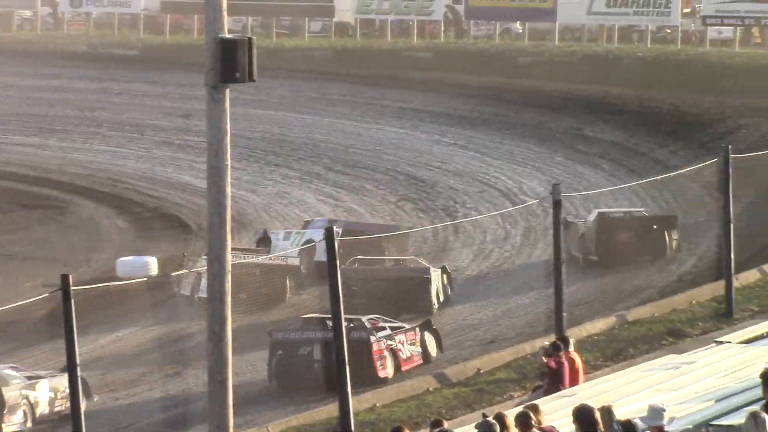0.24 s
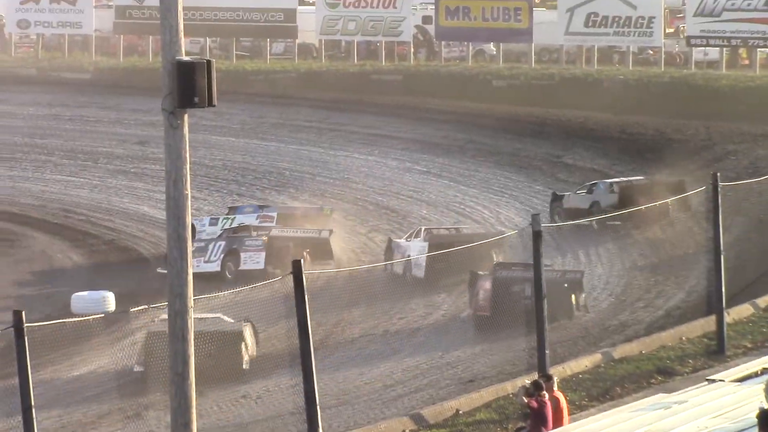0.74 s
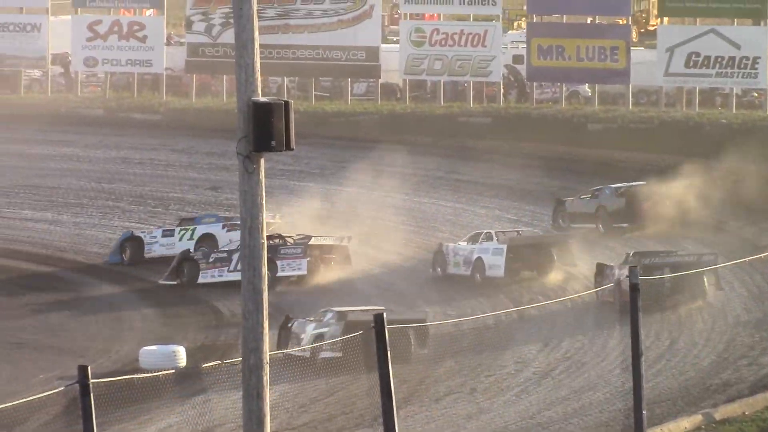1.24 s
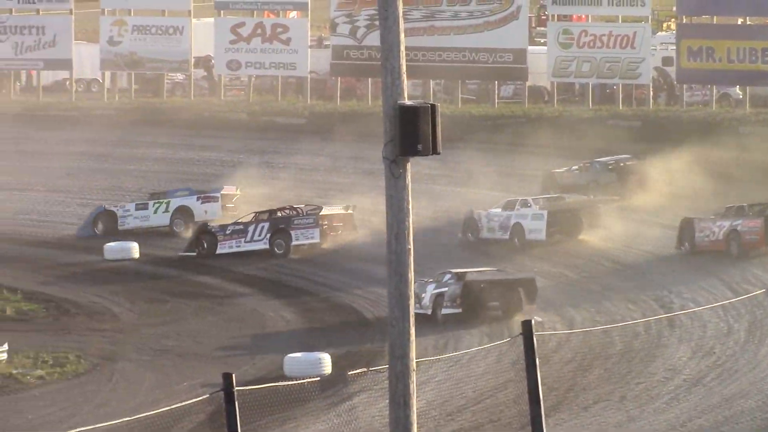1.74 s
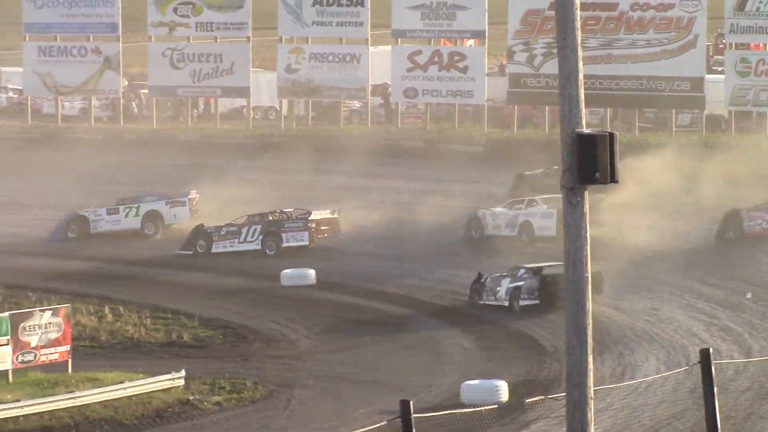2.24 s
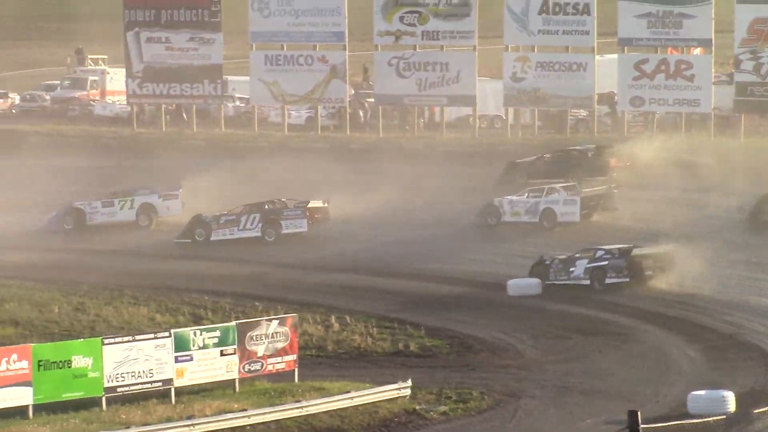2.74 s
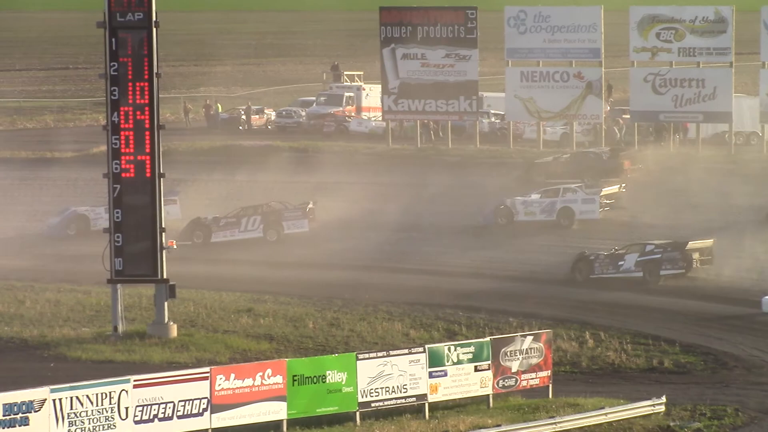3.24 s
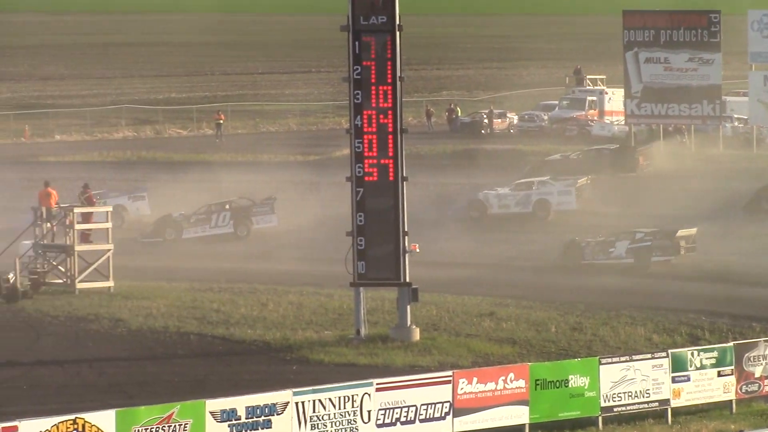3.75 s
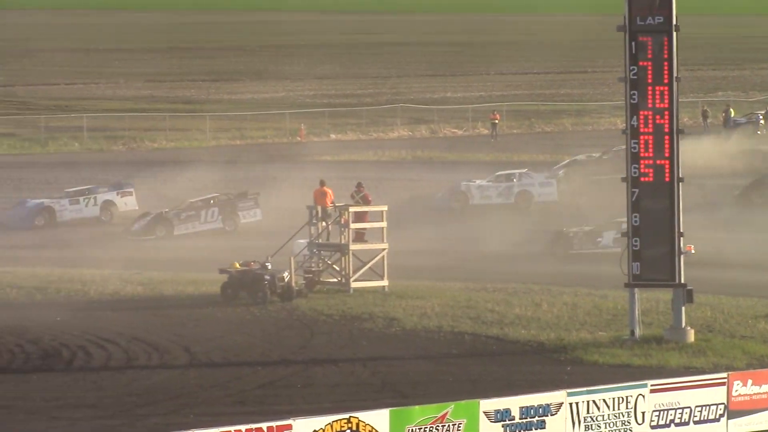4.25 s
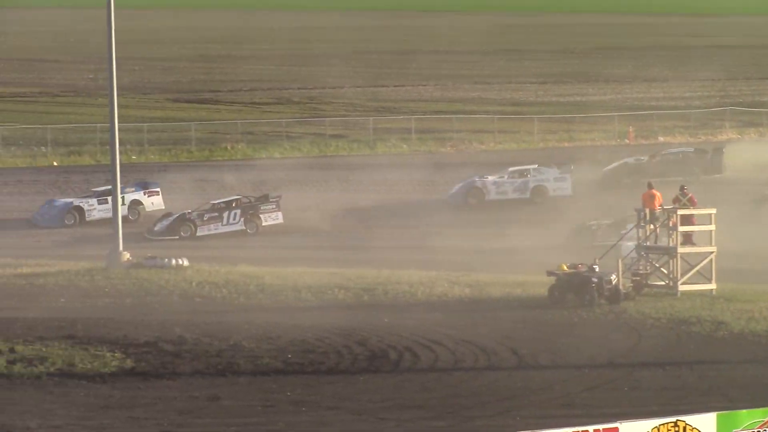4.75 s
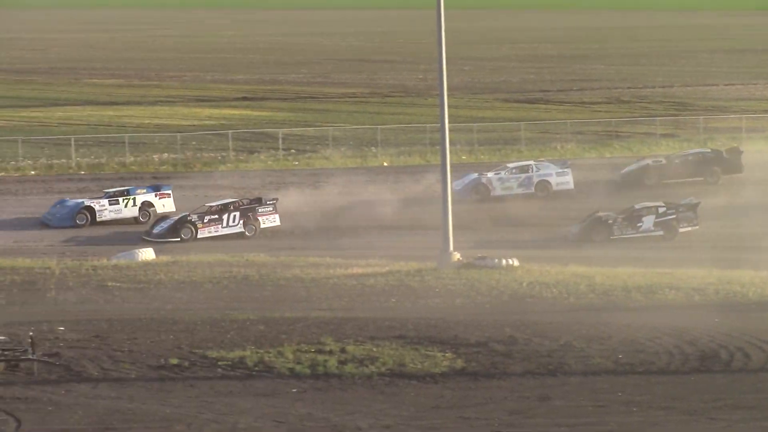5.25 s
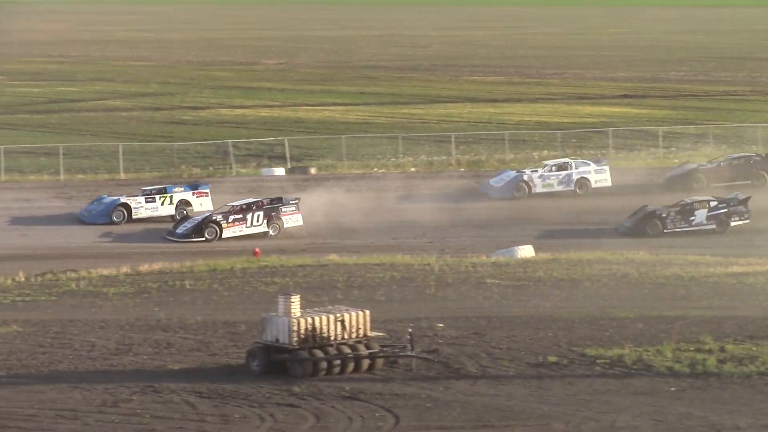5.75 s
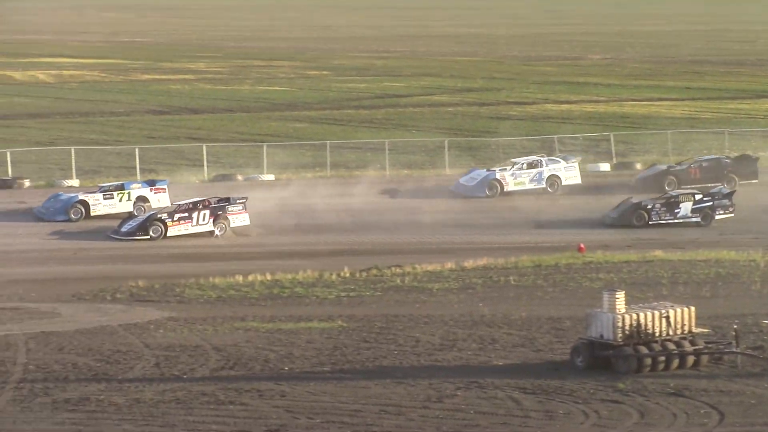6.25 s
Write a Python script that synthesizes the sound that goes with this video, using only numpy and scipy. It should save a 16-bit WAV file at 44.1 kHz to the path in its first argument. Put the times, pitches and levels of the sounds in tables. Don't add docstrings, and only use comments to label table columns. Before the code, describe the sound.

Several open-exhaust race engines rasp and pop around a dirt oval, subdued at first, building steeply into a loud, slightly distorted roar.

```python
import sys
import numpy as np
from scipy import signal
from scipy.io import wavfile
from scipy.ndimage import uniform_filter1d

SR = 44100
rng = np.random.default_rng(int(sys.argv[2]) if len(sys.argv) > 2 else 0)


def store_pcm(level_fs):
    pcm = np.round(np.clip(level_fs, -1, 1) * 32767).astype(np.int16)
    wavfile.write(sys.argv[1], SR, np.atleast_2d(pcm).T)


def ratio_of_db(decibels):
    return 10 ** (np.asarray(decibels, float) / 20)


N = 286650

# t/s, firing rate f/Hz, share of the pack level/dB
LEAD_CAR = [(0, 290, -2), (.5, 282, 2), (1.1, 306, 1), (1.35, 306, 2), (1.55, 274, 2), (2.5, 278, 4),
            (2.7, 302, 5), (3.35, 311, 4), (3.7, 296, 4), (4.5, 302, 2), (5, 318, 2), (5.8, 266, -2),
            (6.5, 268, -1)]
# t/s, firing rate f/Hz, share of the pack level/dB
CHASING_CARS = [
    [(0, 251, -3), (.6, 329.3, 4), (1.15, 410.8, 6), (1.6, 386.7, -7.5), (2.75, 412.4, 5), (3.1, 419, 2.5),
     (4, 395.7, 0.5), (5.6, 413.7, -6), (6.5, 397.2, -2)],
    [(0, 235, -8), (1.2, 245.5, -1.5), (2, 352, -5), (3, 374, 0), (3.6, 356, -12), (5, 363.8, -13.5),
     (5.8, 341.9, 0.5), (6.5, 328.5, 0.5)],
    [(0, 317.7, -19), (1.8, 275.5, 2.5), (3.3, 290.4, -7.5), (4.3, 283.7, -6), (5.4, 286.7, -0.5),
     (5.9, 236.2, -3.5), (6.2, 244.1, -4), (6.5, 260.7, -1.5)],
    [(0, 361, -7.5), (1.5, 316.7, -10.5), (3, 259.4, 4), (4.2, 255.2, -2), (4.6, 344.5, 1),
     (5.5, 299.6, 1.5), (6.5, 306.4, -3.5)],
]
CYLINDER_LEVELS = [0, -4, -1.5, -5, -1, -3, -5.5, -2.5]
# t/s, roar level/dB
THROTTLE = [(0, -32), (.2, -34.5), (.42, -36.5), (.55, -35), (.72, -33.5), (.88, -32.5), (1.5, -35),
            (1.63, -40.5), (2.0, -36.5), (2.55, -37.5), (3.4, -35.5), (3.85, -34.5), (4.0, -32.5),
            (4.12, -30.5), (4.5, -28), (5.2, -23), (5.85, -16.5), (6.15, -15), (6.5, -14.5)]
# f/Hz, level/dB per Hz
ROAR_COLOUR = [(130, -55), (240, -39.5), (300, -30), (450, -25.5), (620, -5), (800, -5), (1070, -4.5),
               (1400, 1.5), (2800, 0), (4100, -10), (5000, -23), (6500, -26), (9000, -43.5), (11000, -61.5),
               (13000, -75.5), (15000, -100)]
# t/s, f/Hz
RASP_CENTRE = [(0, 2300), (.6, 2500), (.8, 1700), (.95, 2800), (1.2, 2900), (1.45, 2000), (1.9, 1600),
               (2.3, 2450), (2.9, 2240), (3.6, 2500), (4.15, 2700), (4.32, 1990), (5.03, 2500),
               (5.56, 2100), (5.72, 2580), (6.08, 2600), (6.2, 1600), (6.5, 1600)]
# t/s, level/dB at 110 Hz, at 300 Hz, at 500 Hz
WIND_FILTER = [(0, 8, -8.5, -7.5), (1.55, 13, -4, -4.5), (3.28, 15.5, 6, -12.5), (3.78, 6, 9, -4),
               (4.295, 8, -5.5, -2.5), (4.78, 5, 7.5, -12.5), (5.27, 14.5, 10, -2), (5.79, 2, 12, 1)]
# f/Hz, level/dB
PORT_SPREAD = [(300, -60), (1300, -39), (2200, -27), (3600, -19), (5500, -11), (8500, -14), (11500, -3),
               (14000, 0)]
# t/s, side level/dB at 2 kHz, at 10 kHz
BEARING = [(0, -17, 3), (1.5, -11, 0), (3.5, -4, -3), (4.5, -1, -8), (6.5, 3.5, -9)]
# t/s, peak level/dB, f/Hz
POPS = [(0.181, -19, 2000), (0.251, -19, 2740), (0.534, -23, 2800), (0.588, -21, 2660), (0.761, -19, 1690),
        (0.9777, -20.5, 1750), (1.0326, -24, 2760), (1.375, -27.5, 2810), (1.4292, -16, 1880),
        (1.512, -20, 2260), (1.8013, -27, 2610), (1.8857, -25.5, 1711), (1.9344, -26, 2800),
        (2.1086, -27, 1520), (2.2365, -19.5, 1760), (2.5222, -30, 1790), (2.6454, -26.5, 1740),
        (2.9103, -24, 3200), (2.9621, -20.5, 2540), (3.0605, -29, 2700), (3.1054, -26, 1900),
        (3.208, -29, 2840), (3.316, -24.5, 1790), (3.3748, -25.5, 2630), (3.503, -29.5, 2070),
        (3.5604, -29, 2350), (3.659, -23.5, 2300), (3.8876, -24, 2710), (3.934, -23.5, 1910),
        (3.9814, -23, 1930), (4.0249, -24.5, 2130), (4.0637, -24, 2580), (4.2902, -15, 1870),
        (4.5017, -25.5, 1700), (4.5546, -23, 2100), (4.6309, -11, 2230), (4.6763, -22, 1910),
        (4.9203, -22, 2040), (4.9781, -13.5, 2630), (5.2326, -16.5, 1900), (5.3493, -16, 2220),
        (5.4565, -12.5, 1820), (5.5833, -17, 1790), (5.7456, -9.5, 2340), (5.7948, -13.5, 2050),
        (5.859, -8, 2110), (6.0028, -7.5, 2200), (6.2911, -5.5, 1640), (6.3447, -15, 2210),
        (6.3735, -11, 1700)]
# t/s, length/s, from f/Hz, to f/Hz, level/dB in the pack
PIPE_NOTES = [(.6, .5, 330, 400, -21), (.95, .22, 300, 330, -18), (.65, .22, 1430, 1400, -21),
              (.89, .15, 770, 805, -16), (.89, .13, 715, 745, -16), (.91, .08, 1130, 1140, -16),
              (1.08, .14, 770, 755, -16), (.48, .15, 950, 935, -20), (1.0, .2, 1450, 1400, -18),
              (2.0, .27, 715, 735, -19), (2.5, .35, 385, 418, -15), (2.4, .67, 860, 985, -15.5),
              (2.5, .4, 750, 810, -19), (2.98, .22, 800, 815, -17), (3.74, .58, 104, 113, -16),
              (3.447, .63, 362, 360, -21.5), (3.9, .45, 768, 792, -18), (3.95, .17, 945, 975, -19),
              (4.358, .33, 680, 692, -21), (4.62, .18, 625, 610, -21), (5.3, .17, 575, 578, -18),
              (5.5, .12, 560, 565, -21), (5.453, .23, 408, 414, -20), (5.55, .45, 150, 180, -15),
              (5.3, .25, 240, 235, -20), (6.15, .35, 188, 181, -19), (5.8, .11, 810, 815, -19),
              (5.8, .12, 695, 710, -22), (6.0, .2, 740, 752, -18), (6.0, .24, 795, 805, -20),
              (6.05, .2, 645, 685, -21), (6.15, .15, 488, 487, -21), (6.197, .3, 528, 540, -21),
              (6.05, .3, 1400, 1370, -21), (6.2, .23, 640, 600, -21), (6.3, .13, 735, 745, -18),
              (6.24, .22, 955, 940, -19), (6.14, .15, 985, 990, -21), (6.25, .21, 1150, 1145, -19),
              (6.38, .14, 1005, 1015, -18)]
# t/s, length/s, from f/Hz, to f/Hz, level/dB in the pack
MORE_PIPE_NOTES = [(2.6, .8, 298, 313, -15), (3.25, .65, 314, 298, -15.5), (3.8, .5, 300, 290, -19),
                   (2.75, .4, 415, 422, -17), (3.3, .35, 1140, 1125, -15), (5.9, .3, 1340, 1375, -21)]
# t/s of the peak, swell level/dB, rise/s, fall/s, extra bite level/dB
STABS = [(.79, 3, 0.053, 0.06, -2.5), (1.02, 1, 0.051, 0.11, 1), (1.2, 2, 0.24, 0.046, 1),
         (1.51, 1.5, .06, .02, -1.5), (1.89, 3.5, 0.034, .03, -2.5), (2.25, -0.5, 0.11, 0.2, 4),
         (2.749, 0, 0.15, 0.32, 2.5), (2.949, 0, 0.2, 0.17, 2.5), (3.32, 0, 0.042, 0.064, 0),
         (3.57, 0.5, 0.069, 0.063, 3), (4.11, 0.5, 0.11, 0.076, 3.5), (4.23, 2.5, 0.063, 0.021, -0.5),
         (4.31, 7, 0.24, 0.14, 2), (4.72, 2, 0.11, 0.074, 1), (5.039, 2.5, 0.3, 0.09, 3.5),
         (5.36, 1.5, 0.027, 0.036, -0.5), (5.49, 3, 0.36, 0.028, 0), (5.72, 1, 0.097, 0.012, 7),
         (5.754, -2.5, 0.031, .03, 9.5), (5.82, 0.5, 0.047, 0.036, 1), (5.94, 0.5, 0.043, 0.034, 2),
         (6.04, 0, 0.049, 0.039, 4), (6.1, 0.5, 0.1, 0.04, 4), (6.29, 0.5, 0.062, 0.027, 3),
         (6.44, 0.5, 0.056, .04, -0.5)]
# t/s, level/dB, f/Hz
GRIT = [(.79, -40, 1500), (1.43, -42, 1200), (1.45, -46, 800), (2.32, -44, 1400), (2.32, -60, 9000),
        (4.59, -51, 9000), (4.632, -31, 6000)]
# t/s, length/s, from f/Hz, to f/Hz, level/dB
INSECT = (5.16, .09, 9700, 10300, -66)
# t/s, level/dB
OVERLOADS = [(5.748, -34), (5.805, -36), (6.035, -33), (6.052, -33), (6.07, -33), (6.1135, -19),
             (6.27, -37), (6.29, -35)]

BODY_DB, BODY_PER_STAB = 0, -0.56
PIPES_TURN_S, PIPES_TURN_LENGTH_S, PIPES_TURN_DB = 5.82, 0.82, 6.5
AIR_NEAR_DB, AIR_FAR_DB, RECEDE_S = 18.5, -2.5, 2.94
AIR_PER_STAB = -0.083
BITE_HZ, BITE_OCTAVES, FLUTTER_DB = 4000, 0.99, -0.2
RASP_DB, RASP_OCTAVES = 1, 0.25
LEAN, LEAN_FADE_S, LEAN_STAYS = .1, 1.2, .02
POP_DB, POP_DECAY_S = -8, .002
UPPER_NOTES_DB = -1
CLIP_AT, RAIL_DB, SPRAY_DB = 5., -25, -11


def unit(x):
    return x / np.sqrt(np.mean(x ** 2))


def curves(table):
    s, *columns = np.transpose(table)
    return [np.interp(np.arange(N) / SR, s, c) for c in columns]


def on_log(hz, table):
    f, db = np.transpose(table)
    return np.interp(np.log(hz + 1), np.log(f), db)


def walk(rate):
    k = int(SR / rate)
    held = np.repeat(rng.standard_normal(N // k + 1), k)
    return uniform_filter1d(uniform_filter1d(held, k), k)[:N]


def engine(hz, wobble, scatter_db, puff, split_hz):
    turns = np.cumsum(hz * (1 + wobble * walk(rate=12))) / SR + rng.random()
    firing = turns.astype(int)
    scatter = scatter_db * rng.standard_normal(4000)[firing]
    size = ratio_of_db(np.array(CYLINDER_LEVELS)[firing % 8] + scatter)
    edge = np.flatnonzero(np.diff(firing))
    late = (turns[edge + 1] % 1) / (turns[edge + 1] - turns[edge])
    pulses = np.zeros(N)
    pulses[edge] = size[edge + 1] * late
    pulses[edge + 1] = size[edge + 1] * (1 - late)
    gas = unit(size * np.exp(-(turns % 1) / puff) * rng.standard_normal(N))
    low = signal.butter(1, split_hz, fs=SR)
    return signal.lfilter(*low, unit(pulses)), gas - 0.53 * signal.lfilter(*low, gas)


def stands(x, t60_s, wet_db):
    hop, t = SR // 5, np.arange(SR // 2) / SR
    padded, out = np.pad(x, (hop, 2 * hop)), np.zeros(N + 8 * hop)
    fade = np.sqrt(np.hanning(2 * hop))
    for start in range(0, N + hop, hop):
        tail = rng.standard_normal(len(t)) * ratio_of_db(-60 * t / t60_s) * (t > .003)
        tail = tail / np.sqrt(np.sum(tail ** 2))
        echo = signal.fftconvolve(padded[start:start + 2 * hop] * fade, tail)
        out[start:start + len(echo)] += echo
    return ratio_of_db(wet_db) * out[hop:hop + N]


def pack():
    thump, rasp, side = 0, 0, 0
    for table in [LEAD_CAR] + CHASING_CARS:
        hz, share_db = curves(table)
        wobble = .006 if table is LEAD_CAR else .016
        pulses, gas = engine(hz, wobble, scatter_db=1.6, puff=.55, split_hz=420)
        near = ratio_of_db(share_db + 0.42 * walk(rate=9.9))
        thump = thump + near * pulses
        rasp = rasp + near * gas
        side = side + rng.standard_normal() * near * gas
    blur = rng.standard_normal((2, N)) * ratio_of_db(0.86 * walk(rate=9))
    roar = thump + stands(thump, t60_s=.15, wet_db=-4) + ratio_of_db(1.5) * rasp
    tones = sum(glide(*note) * ratio_of_db(UPPER_NOTES_DB * (note[2] > 450)) for note in PIPE_NOTES + MORE_PIPE_NOTES)
    mid = unit(unit(roar) + ratio_of_db(-0.5) * blur[0]) + tones
    return unit(mid), unit(.2 * unit(side) + blur[1])


def shape(x, extra_db=0, side=False):
    hz, s, spec = signal.stft(x, SR, nperseg=1024, noverlap=768)
    t = np.arange(N) / SR

    def bump(centre_hz, octaves):
        return np.exp(-(np.log2((hz[:, None] + 1) / centre_hz) / octaves) ** 4)

    stab_db = np.interp(s, t, stabs_db())
    turned = np.clip((s - PIPES_TURN_S) / PIPES_TURN_LENGTH_S, 0, 1)
    body_db = BODY_DB + BODY_PER_STAB * stab_db + PIPES_TURN_DB * turned
    db = (on_log(hz, ROAR_COLOUR) + extra_db)[:, None] + bump(665, 0.92) * body_db

    bright_db = AIR_FAR_DB + (AIR_NEAR_DB - AIR_FAR_DB) * np.exp(-s / RECEDE_S) + AIR_PER_STAB * stab_db
    db = db + np.clip((hz[:, None] - 2510) / 4300, 0, 2.2) * bright_db

    bite_db = stabs_db(bite=True) + FLUTTER_DB * walk(rate=15)
    db = db + bump(BITE_HZ, BITE_OCTAVES) * np.interp(s, t, bite_db)
    rasp_hz = np.interp(s, *np.transpose(RASP_CENTRE))
    db = db + RASP_DB * bump(rasp_hz, RASP_OCTAVES)
    if side:
        at, low_db, top_db = np.transpose(BEARING)
        db = db + bump(1900, 0.71) * np.interp(s, at, low_db)
        db = db + bump(11000, 0.39) * np.interp(s, at, top_db)

    gusts = rng.standard_normal((len(s), 24))
    gusts = uniform_filter1d(uniform_filter1d(gusts, size=14, axis=0), size=10, axis=0).T
    band = np.clip(4 * np.log2((hz + 1) / 250), 0, 23).astype(int)
    db = db + 0.7 * gusts[band] / np.std(gusts)

    steps = np.array(WIND_FILTER)
    now = steps[np.searchsorted(steps[1:, 0], s)].T
    db = db + bump(118, 0.39) * now[1] + bump(303, 0.66) * now[2] + bump(537, 0.33) * now[3]
    return signal.istft(spec * ratio_of_db(db), SR, nperseg=1024, noverlap=768)[1][:N]


def pops():
    size = 600
    out, age = np.zeros(N + size), np.arange(size) / SR
    for s, db, hz in POPS:
        noise = rng.standard_normal(size)
        band = signal.butter(5, [hz / 1.5, hz * 1.6], "bandpass", fs=SR, output="sos")
        crack = signal.sosfilt(band, noise * np.exp(-age / POP_DECAY_S))
        start = int(s * SR)
        out[start:start + size] += ratio_of_db(db + POP_DB) * crack / np.max(np.abs(crack))
    return out[:N]


def glide(s, length, from_hz, to_hz, db):
    span = slice(int(s * SR), min(int((s + length) * SR), N))
    age = (np.arange(N)[span] / SR - s) / length
    hz = (from_hz + (to_hz - from_hz) * age) * (1 + .009 * walk(rate=25)[span])
    level = ratio_of_db(db + 4 * walk(rate=30)[span]) * np.abs(np.sin(np.pi * age)) ** .55
    out = np.zeros(N)
    out[span] = level * np.sin(2 * np.pi * np.cumsum(hz) / SR)
    return out


def stabs_db(bite=False):
    t, total = np.arange(N) / SR, np.zeros(N)
    for s, swell_db, rise, fall, bite_db in STABS:
        ramp = np.clip(np.minimum(1 + (t - s) / rise, 1 - (t - s) / fall), 0, 1)
        total += (bite_db if bite else swell_db) * ramp
    return total


def grit_ticks():
    t, out = np.arange(N) / SR, np.zeros(N)
    for s, db, hz in GRIT:
        age = np.clip(t - s, 0, 1)
        envelope = np.exp(-age / 0.0011) * np.clip(age / .0004, 0, 1)
        out += ratio_of_db(db) * envelope * np.sin(2 * np.pi * hz * age)
    out = signal.sosfilt(signal.butter(4, 500, "highpass", fs=SR, output="sos"), out)
    return np.array([out, .2 * out])


def insect_chirp():
    rough = unit(uniform_filter1d(rng.standard_normal(N), size=60))
    chirp = 1.8 * glide(*INSECT) * rough
    return np.array([chirp, -chirp])


def scene():
    mid, side = pack()
    mid = shape(mid)
    side = shape(side, on_log(np.fft.rfftfreq(1024, 1 / SR), PORT_SPREAD), side=True)
    treble = signal.sosfiltfilt(signal.butter(2, [3500, 7000], "bandpass", fs=SR, output="sos"), mid)
    side = side - (LEAN_STAYS + LEAN * np.exp(-np.arange(N) / SR / LEAN_FADE_S)) * treble
    gain = ratio_of_db(curves(THROTTLE)[0] + stabs_db() + 1.41) / np.std(mid)
    roar = gain * np.array([mid + side, mid - side])
    return roar + grit_ticks() + insect_chirp() + pops() + pops()


def low_pass(x):
    return signal.sosfilt(signal.butter(12, 15100, fs=SR, output="sos"), x)


def record(dry):
    lag = 78
    mid = dry.mean(axis=0)
    treble = signal.sosfiltfilt(signal.butter(2, [4700, 6300], "bandpass", fs=SR, output="sos"), mid)
    x = dry - np.pad(.06 * mid + .36 * treble, (lag, 0))[:N]
    x = x + ratio_of_db(-98) * rng.standard_normal(x.shape)
    x = CLIP_AT * np.tanh(x / CLIP_AT)
    x = x - ratio_of_db(RAIL_DB) * np.power(np.clip(x, -1, 1), 7)
    strain = uniform_filter1d(mid ** 2, size=900) ** 2
    high = signal.butter(4, 10500, "highpass", fs=SR, output="sos")
    fizz = signal.sosfilt(high, rng.standard_normal(x.shape))
    x = x + ratio_of_db(SPRAY_DB) * strain * fizz
    for s, db in OVERLOADS:
        x[:, int(s * SR) + np.arange(4)] -= ratio_of_db(db) * np.hanning(6)[1:-1]
    return low_pass(x)


dry = scene()
out = record(dry)
store_pcm(out)
```